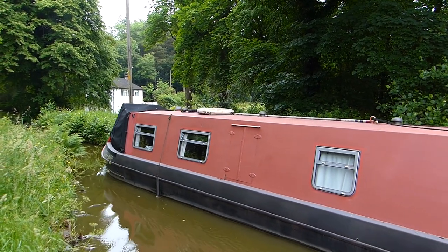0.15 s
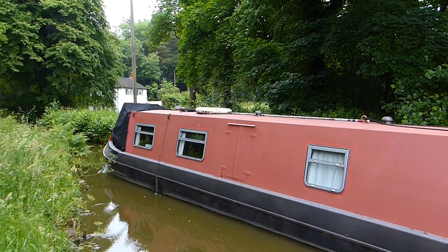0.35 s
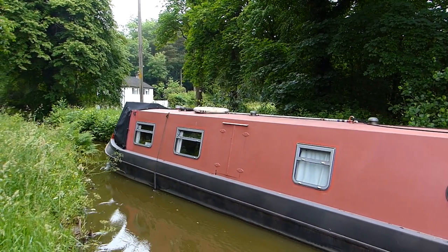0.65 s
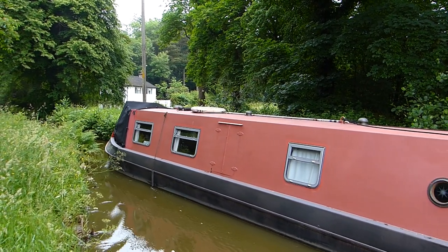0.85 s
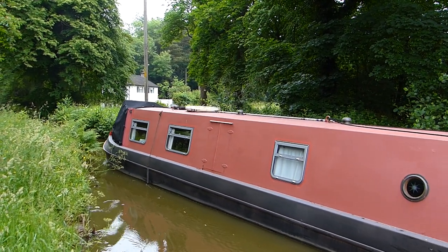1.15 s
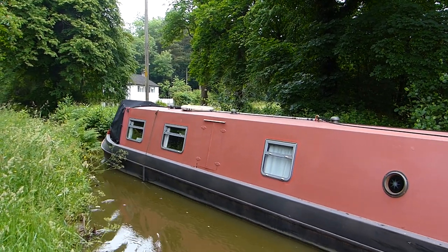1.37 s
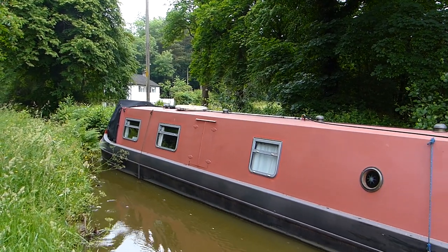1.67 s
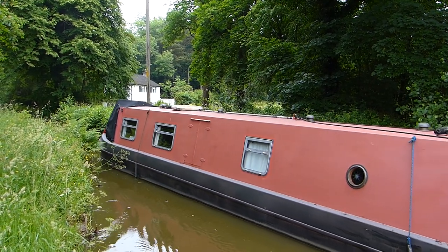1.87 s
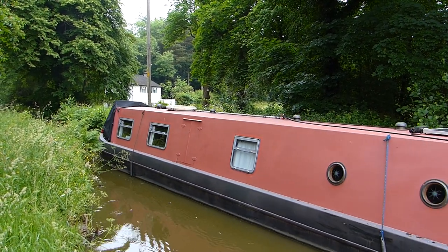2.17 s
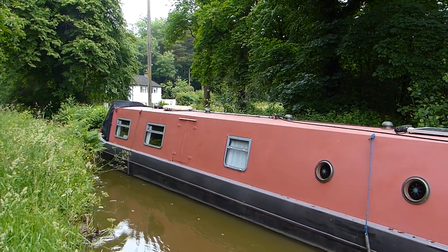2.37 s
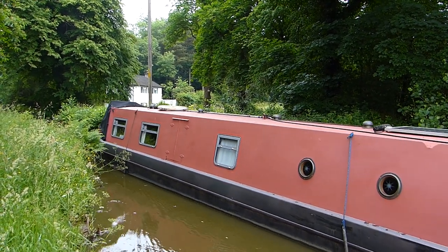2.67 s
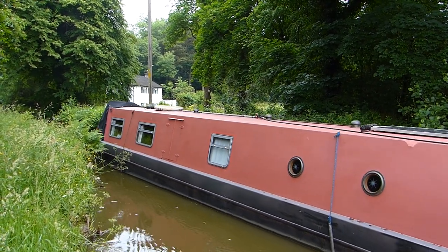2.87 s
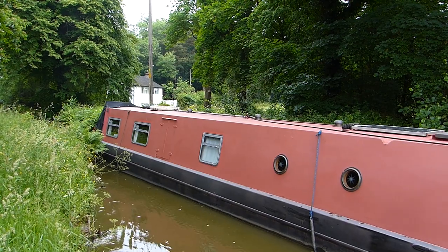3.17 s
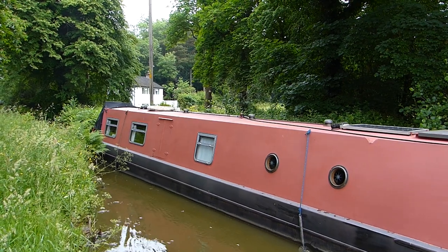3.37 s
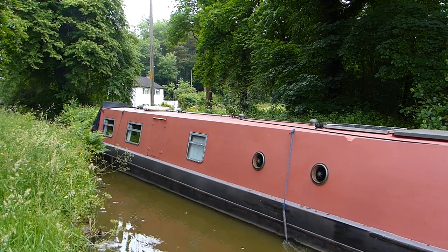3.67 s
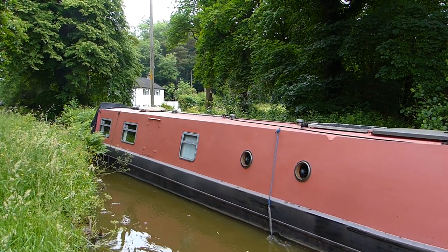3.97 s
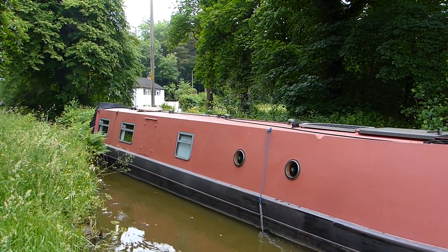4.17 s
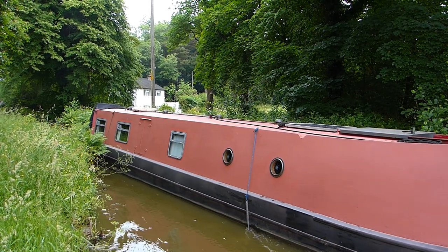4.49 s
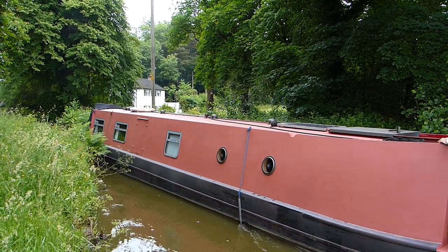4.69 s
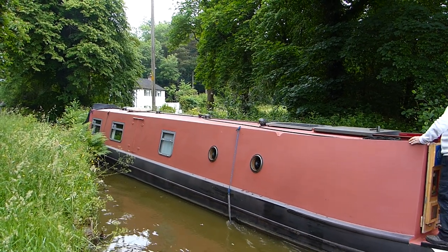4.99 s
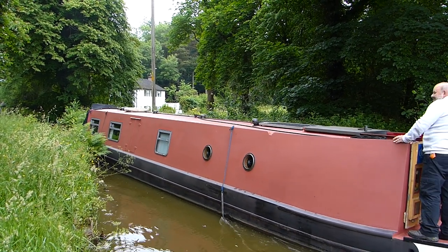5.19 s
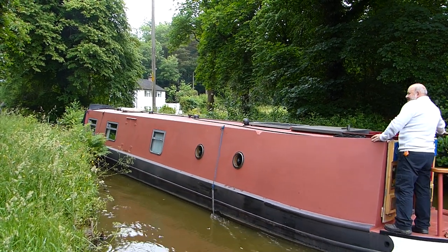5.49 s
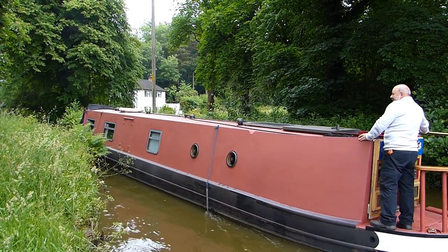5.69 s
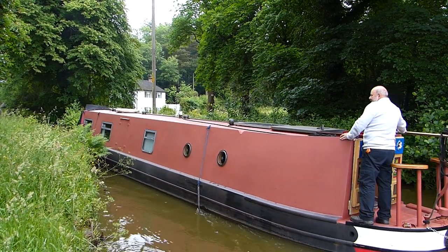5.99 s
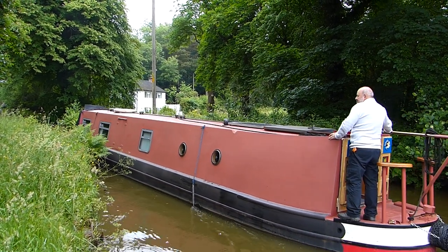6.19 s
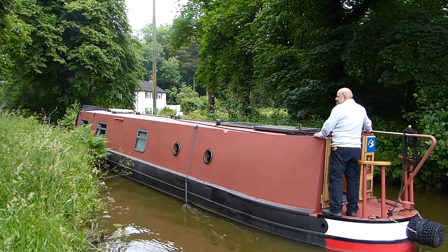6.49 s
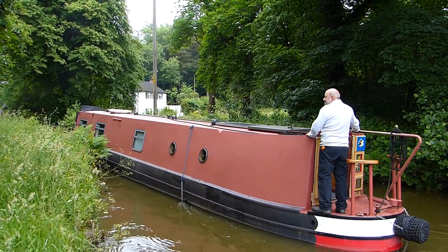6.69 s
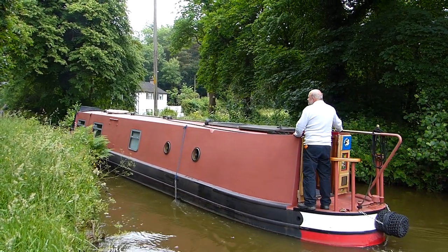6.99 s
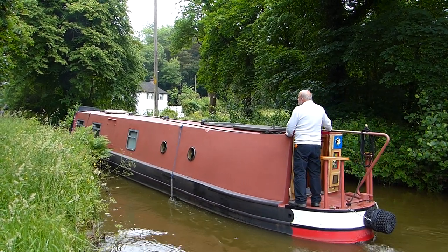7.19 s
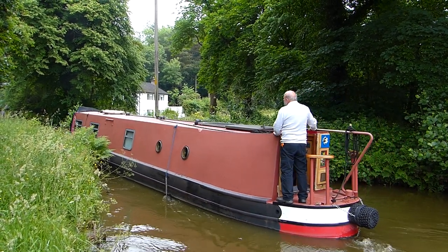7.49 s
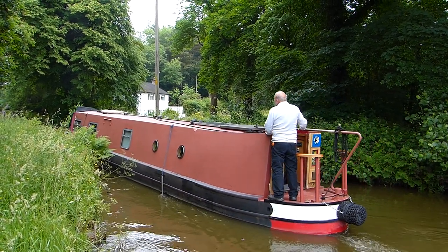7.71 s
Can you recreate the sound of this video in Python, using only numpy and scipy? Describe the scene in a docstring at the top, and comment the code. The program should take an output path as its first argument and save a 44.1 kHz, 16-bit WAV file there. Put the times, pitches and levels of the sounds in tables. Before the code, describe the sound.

A four-cylinder boat diesel runs at unvarying low speed, close and to the right, its low hum under quick ringing knocks and fizzy mechanical hiss. Water briefly laps along the hull at first, with small drips. Blackbird whistles echo from trees at left. Midway the open stern passes, the knocks soften into broader clatter, and gurgling wash and bright droplets follow as the engine slightly recedes.

```python
"""On a canal, a narrowboat slides past, its four-cylinder diesel turning at a steady low speed.
The exhaust hums as one repeated beat, knocks ring the block and noise throbs as clatter and valve hiss.
As the stern comes round, the knocks sink into engine-bay clatter and the bubbling propeller wash.
Pitched bubbles make the splashes; a blackbird's glides and a smaller bird's thin calls come from the left."""
import sys
import numpy as np
from scipy import signal
from scipy.fft import rfft, irfft
from scipy.io import wavfile

SR = 44100
rng = np.random.default_rng(int(sys.argv[2]) if len(sys.argv) > 2 else 0)


def master_out(mix):
    """Clip the mix to full scale and print it as 16-bit PCM to the path in sys.argv[1]."""
    frames = np.transpose(np.atleast_2d(mix))
    ceiling = np.clip(frames, -1, 1)
    pcm = np.round(ceiling * 32767).astype(np.int16)
    wavfile.write(sys.argv[1], SR, pcm)


N = 346185
TIME = np.arange(N) / SR
FREQS = np.fft.rfftfreq(N, 1 / SR)
# the open stern turns toward the listener: middle and time scale of the turn (s)
STERN_S, STERN_TURN_S = 4.48, 1


def amp(db):
    """Decibels to gain."""
    return 10 ** (np.asarray(db) / 20)


def evened(x):
    """Scales to an rms of 1."""
    return x / np.sqrt(np.mean(x ** 2) + 1e-20)


def follow(table):
    """Every column of a curve table at every sample."""
    s, *columns = np.transpose(table)
    return [np.interp(TIME, s, c) for c in columns]


def read(points):
    """A spectrum table on a log-frequency axis."""
    hz, value = np.transpose(points)
    return np.interp(np.log(FREQS + 1), np.log(hz + 1), value)


def colour(x, points):
    """Filters by a spectrum table, then evens the level."""
    return evened(irfft(rfft(x) * amp(read(points)), N))


def resonate(x, hz, width_hz):
    """A resonance that follows a pitch curve: the sound is shifted to 0 Hz, smoothed and shifted back."""
    turn = np.exp(2j * np.pi * np.cumsum(hz * np.ones(N)) / SR)
    r = np.exp(-np.pi * width_hz / SR)
    smoothed = signal.lfilter([1 - r], [1, -2 * r, r * r], x / turn)
    return evened((turn * smoothed).real)


def pan(x, balance_db):
    """Leans a sound by left-over-right dB (positive is left), keeping the middle level."""
    left = np.atleast_1d(amp(balance_db))
    return x * np.array([left, np.ones_like(left)]) * 2 / (1 + left)


def noise_pair():
    """White noise at two ears, with a left-right likeness that varies by frequency."""
    # how alike the two ears are: f/Hz, correlation [0-1]
    likeness = [(20, 0.1), (60, 0.058), (150, 0.7), (300, 0.54), (1000, 1), (2000, 0.74), (4000, 0.58),
                (8000, 0.4), (14000, 0.13)]
    a, b = rfft(rng.standard_normal((2, N)))
    same = np.clip(read(likeness), -1, 1)
    return irfft(np.array([a, same * a + np.sqrt(1 - same ** 2) * b]), N)


def wander(hz):
    """Slow chance of rms 1, rolling off around the given rate."""
    return evened(irfft(rfft(rng.standard_normal(N)) * np.exp(-(FREQS / hz) ** 2), N))


def add(mix, s, sound):
    """Mixes a sound in at a time."""
    part = mix[..., max(round(s * SR), 0):][..., :sound.shape[-1]]
    part += sound[..., :part.shape[-1]]


def passing(at_s, span_s):
    """Nearness 0-1 of something that goes by: the inverse square of its distance."""
    return 1 / (1 + ((TIME - at_s) / span_s) ** 2)


def turning(at_s, span_s):
    """A smooth change from 0 to 1."""
    return 1 / (1 + np.exp((at_s - TIME) / span_s))


def scattered_echoes(x, t60):
    """Sparse random reflections, different at each ear, die away by 60 dB over t60 seconds."""
    t = np.arange(SR) / SR
    struck = rng.random((2, SR)) < 2000 / SR  # about 2000 echoes per second
    taps = rng.standard_normal((2, SR)) * struck * amp(-60 * t / t60)
    return signal.fftconvolve(np.atleast_2d(x), taps / np.linalg.norm(taps[0]), axes=1)[:, :N]


def water_echo(x, lag_ms, strength):
    """The bounce off the water combs the sound; the comb slides down as the lag grows."""
    late = np.array([np.interp(TIME - lag_ms / 1000, TIME, side) for side in x])
    return (x + strength * late) / np.sqrt(1 + strength ** 2)


def from_right(pair, lag_ms=0.066):
    """A sound from the right reaches the left ear a moment later."""
    delay = np.exp(-2j * np.pi * FREQS * lag_ms / 1000)
    return np.array([irfft(rfft(pair[0]) * delay, N), pair[1]])


def levels(openness):
    """Base levels in dB of hum, drone, engine and hiss: each swells as its part of the boat goes by."""
    hum_db = -32 + 1.74 * passing(at_s=3.8, span_s=2.1)
    drone_db = -39.5 + 5.1 * passing(at_s=4.04, span_s=0.93)
    leaving_db = 1.5 * np.maximum(TIME - 5.8, 0)  # fades by 1.5 dB per s from 5.8 s
    engine_db = -34.8 + 2.82 * passing(at_s=5.23, span_s=0.69) - leaving_db
    hiss_db = -43.6 + 4.36 * openness + 3.85 * passing(at_s=5.17, span_s=0.74)
    return hum_db, drone_db, engine_db, hiss_db


def engine_cycles():
    """Count of engine cycles, two crankshaft turns each."""
    # crankshaft speed: t/s, speed/rpm
    crank_speed = [(0.0, 1093.0), (0.6, 1096.2), (1.5, 1091.2), (2.6, 1093.8), (3.5, 1089.6), (4.4, 1087.2),
                   (5.4, 1091.4), (6.2, 1085.7), (7.0, 1089.5), (7.85, 1087.8)]
    return np.cumsum(follow(crank_speed)[0]) / (120 * SR) - .014


def exhaust(cycles, hum_db, drone_db, side_db, size=2048):
    """One heavy beat a cycle rings through the pipe; above it the firings thump the hull, over a rumble."""
    # exhaust note: order [multiple of the engine cycle rate], relative level/dB
    orders = [(7, -78.5), (8, -47.5), (9, -59), (10, -57.6), (11, -52.6), (12, -33.3), (13, -51.2),
              (14, -53.8), (15, -52.4), (16, -33.6), (17, -46.3), (18, -48), (19, -47.5), (20, -50),
              (21, -54), (22, -58.5), (23, -64.5), (24, -42.8), (25, -65), (26, -58.7), (27, -54.4),
              (28, -43.3), (29, -60.5), (30, -56), (31, -65), (32, -52), (33, -54.5), (34, -59), (35, -61),
              (36, -48.5), (37, -63), (38, -55.5), (39, -56), (40, -51), (41, -55.5), (42, -50), (43, -68),
              (44, -58.5), (45, -57.5), (46, -58.5), (47, -67), (48, -64), (52, -72), (57, -66), (60, -74),
              (64, -68), (80, -64), (90, -64)]
    # thumps on the hull: place in the engine cycle [0-1], relative level/dB
    hull_thumps = [(.122, 0), (.372, -3), (.622, 0), (.873, -3), (.95, -7)]
    # hull rumble: f/Hz, relative gain/dB
    drone_colour = [(20, -37), (50, -41), (90, -8), (130, -12), (170, -0.5), (220, 2.5), (300, -3.5),
                    (390, -0.5), (480, -17), (700, -19), (2000, -48)]
    order, db = np.transpose(orders)
    k = np.arange(size // 2 + 1)
    log_gain = np.log(amp(np.interp(k, np.r_[5, order, 110], np.r_[-88, db, -95])))
    # minimum phase makes the low orders one decaying beat, placed at .533 of the cycle
    ring = signal.hilbert(np.r_[log_gain, log_gain[-2:0:-1]]).imag[:len(k)] + 2 * np.pi * k * .533
    thump_sum = sum(amp(thump_db) * np.exp(-2j * np.pi * k * place) for place, thump_db in hull_thumps)
    upper_phase = np.where(k < 38, -np.angle(thump_sum), 2 * np.pi * rng.random(len(k)))
    phase = np.where(k < 22, ring, upper_phase)
    beat = irfft(np.exp(log_gain - 1j * phase))
    unsteady = cycles + .0005 * wander(25)
    note = evened(np.interp(unsteady, np.arange(size) / size, beat, period=1))
    low = irfft(rfft(note) / (1 + (FREQS / 190) ** 8), N)  # splits hum from drone at 190 Hz
    hum = low * amp(hum_db + 1.5 + 0.29 * wander(7.5))
    upper = (note - low) * amp(.85 * drone_db + 2.2 + 1.2 * wander(10))
    rumble = colour(noise_pair(), drone_colour) * amp(drone_db - 8.2)
    return hum + pan(upper, 0.15 * side_db) + pan(rumble, 0.088 * side_db)


def knocks(cycles, scatter_db, slip, slip_hz, focus_hz=220):
    """Combustion and piston slap: each blow rings the block for a few cycles, its phase never quite steady."""
    # blows: place in the engine cycle [0-1], length/ms at 950 Hz, relative thud, clank and tick levels/dB
    cycle_blows = [(.02, 1.6, -1.5, .5, 1), (.07, 2, -4.5, -12, -8), (.226, 1.9, 1.5, -4, -7),
                   (.267, 2, 3.5, 0, 4), (.35, 2, -7, -16, -16), (.485, 3, -2, -6, -5),
                   (.523, 1.4, -4, .5, 5), (.78, 1.8, -2, 1.5, .5), (.98, 1.8, -5, -11, -10)]
    # extra hard knocks: t/s, boost/dB (before a share of .7-1.3 by mode), f/Hz where it rings most
    hard_knocks = [(.029, 2, 1500), (0.304, 17, 1320), (.552, 5.5, 1600), (.634, 6, 1310), (0.768, 8, 1480),
                   (.798, 2.5, 1000), (.935, 4.5, 1600), (1.128, 6, 1410), (1.402, 1.5, 1500),
                   (1.564, 8.5, 1500), (1.621, 4.5, 1560), (1.649, -1, 1500), (1.677, 5.5, 950),
                   (1.785, 3.5, 920), (2.226, 7, 1070), (2.282, 4.5, 1520), (2.334, 5.5, 945),
                   (2.444, 5, 1500), (2.634, 14.5, 1200), (2.747, 5, 1300), (2.94, 6, 1500),
                   (2.995, 7, 1030), (3.626, 7.5, 1290), (3.65, 4.5, 950), (3.711, 8.5, 1500),
                   (3.871, 4.5, 1000), (4.205, 3, 1000), (4.315, 6.5, 1190), (4.423, 4, 950),
                   (4.534, 5, 1000), (4.979, 8, 1310), (5.252, 6, 1250), (5.528, 8, 1000), (6.384, 9, 1100)]
    # modes of the engine block: f/Hz at the start, relative level/dB, drift [Hz per s] as the boat turns away
    block_modes = [(956, 8, 6), (1224, -2.5, 16), (1611, 5.5, -30.5), (2410, -11, -8), (2787, -4, -16)]
    cycles_per_s, out = np.gradient(cycles) * SR, np.zeros(N)
    scatter = rng.standard_normal((len(cycle_blows), 100))
    for mode_hz, mode_db, drift_hz_per_s in block_modes:
        hz = mode_hz + drift_hz_per_s * TIME
        wobble, ring = slip * wander(slip_hz), np.zeros(N)
        for (place, ms, *thud_clank_tick), chance in zip(cycle_blows, scatter):
            turn = np.round(cycles - place)
            away = (cycles - place - turn) / cycles_per_s  # seconds from the nearest blow
            near = np.flatnonzero(abs(away) < .008)
            db = np.interp(mode_hz, [950, 1560, 2600], thud_clank_tick)
            db = db + scatter_db * chance[turn[near].astype(int) + 1]
            length = ms / 1000 * (950 / mode_hz) ** .35  # higher modes ring shorter
            swell = np.exp(-(away[near] / length) ** 2 / 2)
            ring[near] += amp(db) * swell * np.sin(2 * np.pi * hz[near] * away[near] + wobble[near])
        for s, db, peak_hz in hard_knocks:
            near = np.flatnonzero(abs(TIME - s) < .012)
            share = .7 + .6 * np.exp(-((mode_hz - peak_hz) / focus_hz) ** 2)
            ring[near] *= amp(db * share * np.exp(-((TIME[near] - s) / .004) ** 2))
        out += ring * amp(mode_db + wander(35))
    return evened(out)


def hull_ring(blows, engine_db, ring_db=-19.0):
    """The knocks keep one steel panel singing, its pitch wandering and slowly rising."""
    panel_hz = 925 + 10 * TIME + 45 * wander(9)
    return resonate(blows * amp(wander(8)), panel_hz, width_hz=110) * amp(engine_db + ring_db)


def plating(blows, turns_per_s=1.275):
    """The steel keeps ringing after each blow, from other plates as the hull slides by."""
    # ring of the steel plating: f/Hz, relative gain/dB
    plate_colour = [(700, -31), (945, 4), (1200, 5.5), (1550, 10.5), (2100, -14), (2750, 8.5), (3600, -10)]
    angle = 2 * np.pi * turns_per_s * TIME
    # the blows cross back and forth between two echo patterns
    ring = sum(scattered_echoes(blows * share, t60=0.14) for share in (np.cos(angle), np.sin(angle)))
    return colour(ring + 0.64 * ring[::-1], plate_colour)


def clatter(cycles, openness, throb_db=1):
    """Gears, pump and plating rattle between the knocks, faintly throbbing; deeper clatter from the open stern."""
    # clatter through the hull side: f/Hz, relative gain/dB
    side_colour = [(300, 0), (450, 6), (600, 3), (800, -3), (950, 0), (1200, 10.5), (1570, 0.5),
                   (1900, 6.5), (2800, -4), (3500, -11), (5300, -36), (7000, -60), (15000, -43)]
    # clatter from the open stern: f/Hz, relative gain/dB
    stern_colour = [(40, -38), (300, 0), (410, 3), (570, -6.5), (700, 4), (950, 4), (1300, 3), (1660, -7.5),
                    (1925, -15), (2280, -16), (2850, -7.5), (4100, -16.5), (4450, -30), (15000, -62)]
    firing = np.cos(8 * np.pi * (cycles - .01))  # four firings a cycle
    drive = noise_pair() * amp(throb_db * (1 - openness) * firing + 2.96 * wander(71))
    side_on = colour(drive, side_colour) * np.sqrt(1 - openness)
    stern_on = colour(drive[:, ::-1], stern_colour) * np.sqrt(openness)  # the same noise, backward in time
    return side_on, stern_on


def hiss(cycles, openness, ticks_at=0.17, drops_per_s=500):
    """Valve gear sizzles between the firings; fine spray from the propeller joins it astern."""
    # valve and spray hiss: f/Hz, relative gain/dB
    hiss_colour = [(2000, 1.5), (3600, -4.5), (4050, 3.5), (4400, -1), (4800, 1.5), (5700, 8), (6700, -1),
                   (7900, -2), (8750, -2), (9500, -5), (10500, -7), (11200, -12), (13000, -15.5),
                   (15500, -33)]
    between = np.cos(8 * np.pi * (cycles - ticks_at))
    valves = noise_pair() * amp(2.9 * (1 - .45 * openness) * between + 1.6 * wander(150))
    drop_db = 4.2 * np.minimum(rng.exponential(1, (2, N)), 5)
    spray = (rng.random((2, N)) < drops_per_s / SR) * amp(drop_db)
    spray = evened(spray + 0.15 * scattered_echoes(spray[0], t60=0.033))
    spray = spray * amp(3 * wander(16))
    return colour(valves + .5 * openness * spray, hiss_colour)


def tappets(cycles, hz=4100, length_ms=1.8, scatter_db=4.0, level_db=-51.5, astern_db=-4):
    """Short bright clicks of the valve gear, strongest once each crankshaft turn and never quite equal."""
    # tappet clicks: place in the engine cycle [0-1], relative level/dB
    clicks = [(.02, 0), (.27, -3), (.53, 0), (.78, -10)]
    out, cycles_per_s = np.zeros(N), np.gradient(cycles) * SR
    for place, db in clicks:
        turn = np.round(cycles - place)
        away_ms = 1000 * (cycles - place - turn) / cycles_per_s
        chance = rng.standard_normal(100)[turn.astype(int) + 1]
        out += amp(db + scatter_db * chance) * np.exp(-abs(away_ms) / (2 * length_ms))
    clicking = evened(out * np.sin(2 * np.pi * hz * TIME + 1.2 * wander(220)))
    return clicking * amp(level_db + astern_db * turning(STERN_S, STERN_TURN_S))


def lapping(wash_db=-45):
    """Water fizzes along the side of the hull as the bow wave runs into the bank."""
    fizz = resonate(noise_pair() * amp(3 * wander(30)), hz=5000, width_hz=1100)
    return fizz * amp(wash_db) * passing(at_s=0.1, span_s=0.84)


def bubble(hz, t60, rise, splash):
    """A pocket of air rings, rising in pitch; the splash roughens its tone."""
    t = np.arange(SR // 8) / SR
    lowpass = signal.butter(3, min(.25 * hz, 5000), fs=SR)
    froth = signal.lfilter(*lowpass, rng.standard_normal(len(t)))
    tone = np.sin(2 * np.pi * hz * t * (1 + rise * t)) * (1 + splash * evened(froth))
    return tone * amp(-60 * t / t60) * (1 - np.exp(-t / 0.00016))


def water():
    """Bubbles ring short and high in splashes along the hull, longer and deeper behind the propeller."""
    # splashes by the hull: t/s, level/dB before a 6.5 dB lift, f/Hz, left over right/dB, roughness [ratio]
    drips = [(0.0378, -29.5, 4730, -5, 0.58), (.254, -40, 6500, -5, 1), (0.431, -32, 5100, 14, .9),
             (0.785, -34.5, 5600, -8, 0.81), (3.0063, -27.5, 5300, -1.5, .6), (4.5645, -25.5, 2160, -8, .5),
             (4.753, -29, 2400, -20, .9), (4.979, -32, 2590, -6, 1), (4.997, -31, 4080, -4, .9),
             (5.367, -23, 5940, -10, .5), (5.367, -27, 4100, -7, .4), (5.452, -28, 2160, -9, .6),
             (5.457, -36, 8200, 2, 1), (5.6066, -29.5, 7870, -12, 0.88), (5.749, -32, 2800, -12, .8),
             (5.857, -30, 2830, -4, 0.66), (6.125, -33.5, 6200, -8, 0.83), (6.4233, -38, 7000, 5, 1.2),
             (6.687, -30, 7830, -2.5, 0.75), (6.7695, -28, 2080, -1.5, .8), (6.9691, -31, 7660, -10, 1.2),
             (6.9827, -28, 5760, 1, .9), (7.275, -23, 6900, 1, .25), (7.639, -25, 5150, -2, 0.65),
             (7.6765, -27, 2060, -6, 0.78)]
    # gulps of the propeller wash: t/s, level/dB before a 4.5 dB lift, f/Hz
    gulps = [(4.753, -23, 1150), (4.783, -26, 990), (5.114, -26, 1400), (5.21, -22, 1370),
             (5.552, -24, 1100), (5.575, -25, 1000), (5.61, -29, 1150), (6.012, -26, 1000),
             (6.077, -24.5, 1090), (6.517, -27, 1010), (6.54, -29, 720), (6.783, -25, 1200),
             (6.79, -30, 760), (7.091, -24, 1200), (7.109, -25, 1230), (7.178, -27, 980), (7.194, -21, 864)]
    out = np.zeros((2, N))
    for s, db, hz, side_db, splash in drips:
        add(out, s, pan(amp(db + 6.5) * bubble(hz, t60=0.011, rise=0.91, splash=splash), side_db))
    for s, db, hz in gulps:
        add(out, s, pan(amp(db + 4.5) * bubble(hz, t60=0.04, rise=1.0, splash=0.55), -8))
    return out + amp(-10) * scattered_echoes(out.mean(0), t60=.1)


def whistle(length, start_hz, end_hz, arch_hz, db):
    """One note: an arched glide that swells and fades."""
    u = np.arange(0, length, 1 / SR) / length
    hz = start_hz + (end_hz - start_hz) * u + arch_hz * np.sin(np.pi * u)
    return amp(db) * np.sqrt(np.sin(np.pi * u)) * np.sin(2 * np.pi * np.cumsum(hz) / SR)


def birds():
    """Fluted glides of a blackbird and the thin calls of a smaller bird, echoing from trees on the left."""
    # blackbird notes: t/s, length/s, start f/Hz, end f/Hz, arch/Hz, relative level/dB
    blackbird = [(2.113, 0.19, 1955, 2420, 67, -40), (2.313, 0.093, 2400, 2000, -12, -40),
                 (2.498, 0.13, 1760, 1920, 59, -40), (2.66, 0.033, 3000, 3370, 25, -40),
                 (2.759, 0.128, 2480, 2355, -4, -30), (3.918, 0.11, 2187, 2474, 9, -35),
                 (4.004, 0.09, 2403, 2285, 83, -32), (4.094, 0.078, 2045, 1907, -65, -38),
                 (4.18, 0.06, 2620, 2700, 58, -44)]
    # thin calls of the smaller bird: t/s, length/s, start f/Hz, end f/Hz, arch/Hz, relative level/dB
    chirps = [(0.283, .08, 6800, 6470, 4, -45), (.51, 0.07, 6980, 6600, 3, -48),
              (.735, 0.078, 7200, 6950, 53, -46), (1.1, .1, 8550, 8540, 11, -55),
              (4.02, 0.2, 7320, 7200, -3, -46)]
    song = np.zeros(N)
    for s, *note in blackbird + chirps:
        add(song, s, whistle(*note))
    song *= amp(.7 * wander(40))
    return pan(amp(-5.5) * song + amp(-5) * scattered_echoes(song, t60=.9), 10)


def hollow(cycles, hz, width_hz, level_db, throb_db, place=0.013):
    """Noise through one resonance of the boat, stirred by every firing."""
    throb = throb_db * np.cos(8 * np.pi * (cycles - place))
    return resonate(noise_pair(), hz, width_hz) * amp(level_db + throb)


def panels(cycles, side_db, casing_hz=2930, sag_hz_per_s=120):
    """The casing's rattle slides down while the boat is alongside; the bay's hollow note carries astern."""
    alongside = turning(at_s=0.32, span_s=0.17) * (1 - turning(at_s=3.1, span_s=0.4))
    sagging_hz = casing_hz - sag_hz_per_s * TIME
    casing = hollow(cycles, sagging_hz, width_hz=660, level_db=-43.0, throb_db=4.5) * alongside
    astern = turning(at_s=5.45, span_s=0.97)
    bay = hollow(cycles, hz=1928, width_hz=190, level_db=-41.0, throb_db=5.0) * astern
    return pan(casing, 0.5 * side_db) + pan(bay, -0.68)


def injectors(cycles, tick_db=-58.0):
    """The injectors tick thinly with each firing while the engine bay is near."""
    ticks = hollow(cycles, hz=8850, width_hz=340, level_db=tick_db, throb_db=14.5, place=.15)
    return ticks * passing(at_s=4.8, span_s=0.85)


def gurgle(count=130, from_s=4.5, low_hz=666, high_hz=1467, floor_db=-27, spread_db=0.5):
    """The propeller churns up a crowd of small ringing bubbles as the stern goes by."""
    out = np.zeros((2, N))
    for when, size, pitch, side in rng.random((count, 4)):
        hz = low_hz * (high_hz / low_hz) ** pitch
        db = floor_db + spread_db * min(-np.log(size), 2)
        s = from_s + (TIME[-1] - from_s) * when
        add(out, s, pan(amp(db) * bubble(hz, t60=.04, rise=1.0, splash=.5), 6 * side - 11))
    return out * (1 - turning(at_s=7.14, span_s=.1))


def droplets(count=55, from_s=4.8, low_hz=5040, high_hz=9000, floor_db=-37.5, spread_db=4):
    """Small drops fall back into the water by the stern, each a short high bubble."""
    out = np.zeros((2, N))
    for when, size, pitch, side in rng.random((count, 4)):
        hz = low_hz * (high_hz / low_hz) ** pitch
        db = floor_db + spread_db * min(-np.log(size), 2)
        s = from_s + (TIME[-1] - from_s) * when
        add(out, s, pan(amp(db) * bubble(hz, t60=.014, rise=.7, splash=1.0), 16 * side - 10))
    return out


def scene():
    """The engine's sounds follow the boat from the right toward the middle."""
    cycles = engine_cycles()
    openness = turning(STERN_S, STERN_TURN_S)
    # base lean in dB from right to middle; each layer takes its own share
    side_db = -34.5 + 33.5 * turning(at_s=4.25, span_s=0.77)
    lag_ms = 0.578 + 0.07 * TIME  # the water echo's lag grows as the boat moves on
    hum_db, drone_db, engine_db, hiss_db = levels(openness)
    churn_db = 5.5 * passing(at_s=7.1, span_s=.17)  # the propeller wash boils up briefly
    shade_db = 3 * openness + 3.3 * turning(at_s=5.2, span_s=0.21)  # the stern hides the block

    blows = knocks(cycles, scatter_db=.8, slip=.85, slip_hz=105) * amp(engine_db + .6 - shade_db)
    side_on, stern_on = clatter(cycles, openness)
    side_on = side_on * amp(engine_db - 6.8)
    direct = pan(blows + hull_ring(blows, engine_db), 0.46 * side_db) + pan(side_on, 1.3 * side_db)
    direct = water_echo(direct, lag_ms, strength=.35)
    stern = pan(stern_on * amp(engine_db + churn_db - 0.55), 3.0 * side_db)
    echoes = pan(plating(blows) * amp(engine_db - 6.0), 0.2 * side_db)
    boat = direct + stern + echoes + panels(cycles, side_db) + gurgle()

    sizzle = pan(hiss(cycles, openness) * amp(hiss_db) + injectors(cycles), -1.4)
    sizzle = sizzle + pan(tappets(cycles), -5.1)
    sizzle = water_echo(sizzle, lag_ms, strength=.28 * (1 - openness))

    engine = exhaust(cycles, hum_db, drone_db, side_db) + from_right(boat) + from_right(sizzle, lag_ms=.024)
    return engine + water() + droplets() + lapping() + birds()


def record(dry, edge_hz=15500):
    """A steep low-pass limits the band."""
    lowpass = signal.firwin(511, edge_hz, window=("kaiser", 9), fs=SR)
    return signal.oaconvolve(dry, lowpass[None], "same")


dry = scene()
out = record(dry)
master_out(out)
```